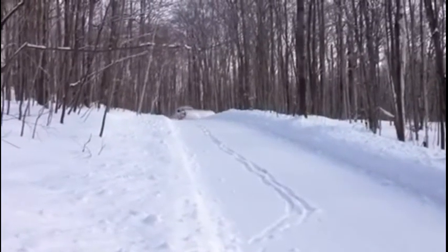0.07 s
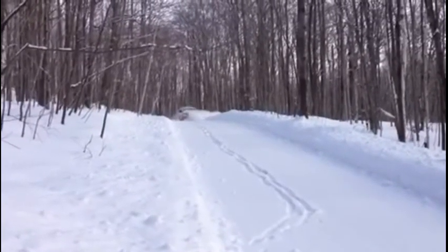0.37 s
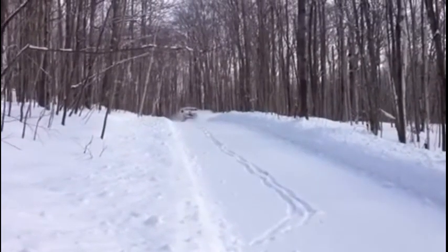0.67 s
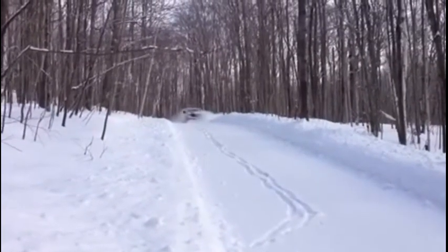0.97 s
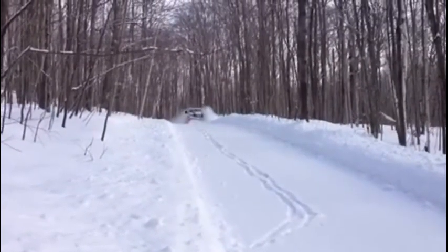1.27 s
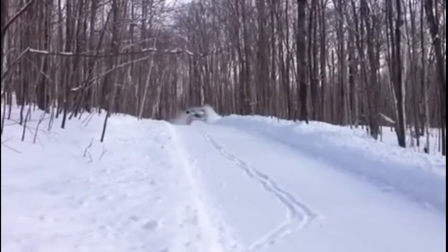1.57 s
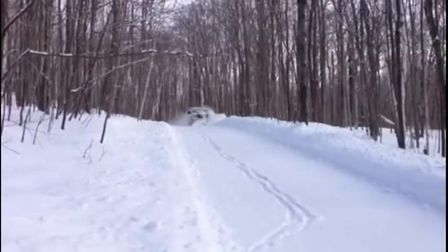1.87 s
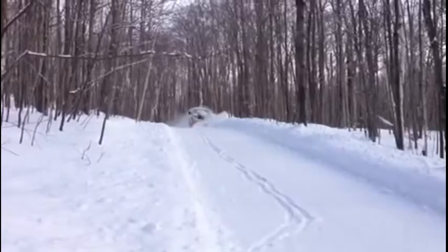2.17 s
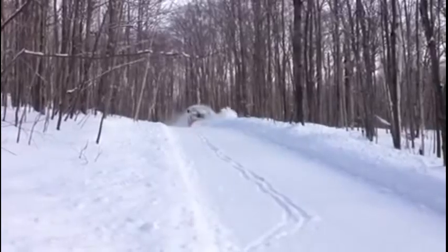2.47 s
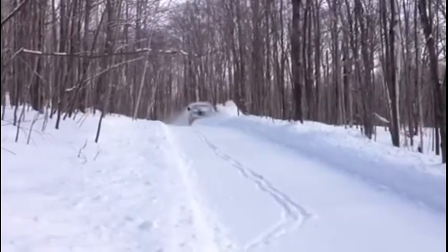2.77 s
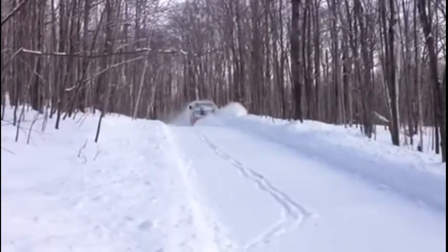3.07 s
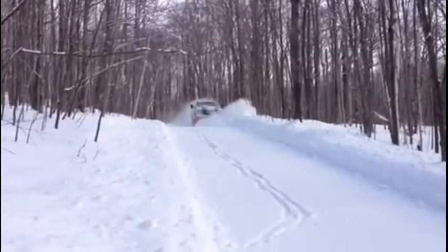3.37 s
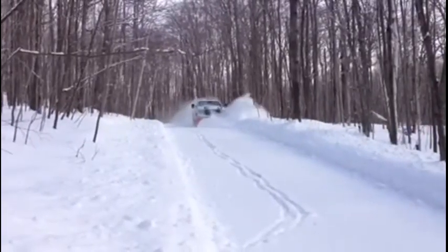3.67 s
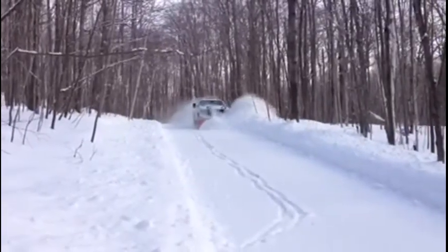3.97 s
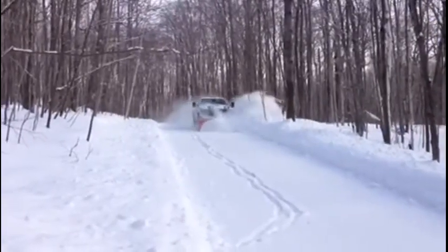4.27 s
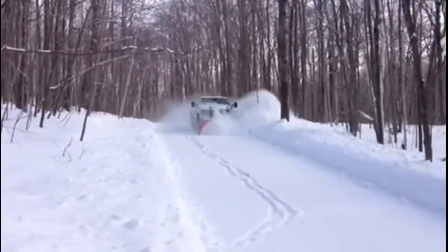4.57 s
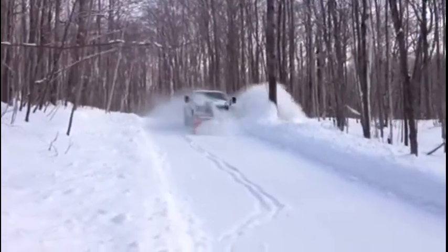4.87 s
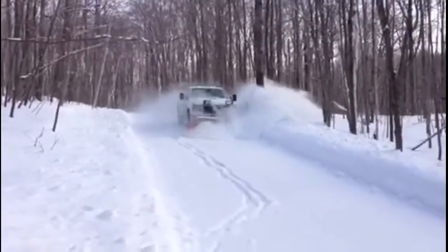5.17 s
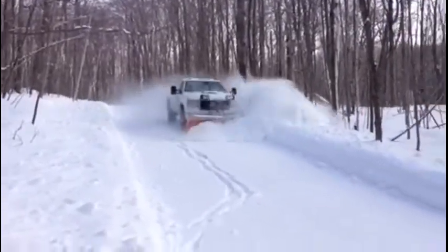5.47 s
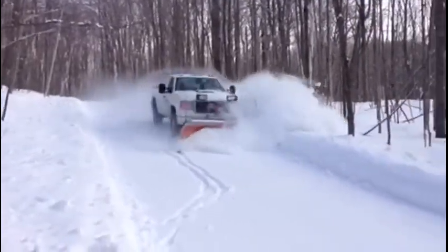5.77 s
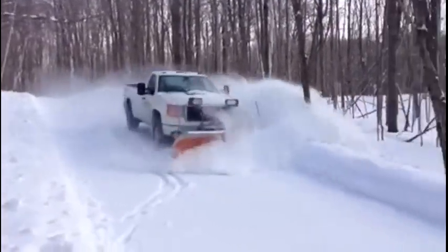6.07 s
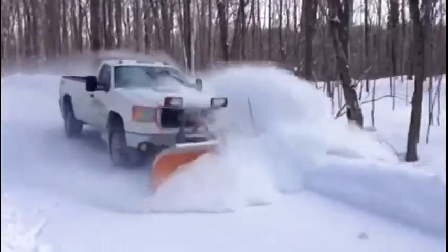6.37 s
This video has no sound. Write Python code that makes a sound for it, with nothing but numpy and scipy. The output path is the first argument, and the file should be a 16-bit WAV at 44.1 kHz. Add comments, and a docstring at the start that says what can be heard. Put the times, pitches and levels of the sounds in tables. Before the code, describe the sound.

A pickup truck pushes a snowplow along a forest road toward a roadside microphone, growing louder throughout. At first it is far off: the steel blade rumbles, scrapes and thumps unevenly over frozen ground, clanking where it catches on crust. The engine is a low hum almost hidden beneath it, and the trees return a thin, dull echo. From just after 2 seconds, crisp, glassy ticks of ice snap close to the microphone, thickest between 4 and 5 seconds. From about 4 seconds the grainy hiss of thrown snow comes up, and from about 4.7 seconds hard lumps of snow knock hollowly on the blade. The bumps and scraping get stronger and drier as the truck nears. From around 6 seconds the hollow of the blade booms, and the plow is loud, close and still approaching when the sound ends at about 6.6 seconds.

```python
"""A pickup truck pushes a snowplow down a forest road, towards one microphone 3 m off its lane.
It starts some 70 m away: the steel blade rumbles, scrapes and thumps over frozen ground, nearly hiding
the engine, and the trees scatter it back. After two seconds crisp ticks begin close to the microphone.
From about four seconds the hiss of thrown snow comes up, then lumps of snow knock on the plate.
By the end the truck is 9 m off, loud and drier, and the hollow of the blade booms."""
import sys
import numpy as np
from scipy import signal
from scipy.fft import rfft, irfft
from scipy.io import wavfile
from scipy.ndimage import uniform_filter1d, minimum_filter1d, map_coordinates

SR = 44100
rng = np.random.default_rng(int(sys.argv[2]) if len(sys.argv) > 2 else 0)


def int16_out(signal):
    """Quantize to a 16-bit WAV file."""
    q = np.round(np.clip(np.atleast_2d(signal).T, -1, 1) * 32767)
    wavfile.write(sys.argv[1], SR, q.astype(np.int16))


N = 292383
TIME = np.arange(N) / SR
SPEED_M_PER_S, PASS_S, LANE_M = 9, 7.6, 3  # the truck would draw level with the microphone at PASS_S
NEAR_M = 10  # the truck's levels hold at this distance

# Broad colours. Each row: frequency in Hz, relative level in dB.
MIC_HISS_COLOUR = [(30, -16), (120, -22), (300, -1), (450, 4), (700, -5.5), (2500, -29), (4200, -9.5),
                   (7000, -12.5), (10000, -12.5), (15000, -20)]  # the background hiss of the microphone
TICK_LOW_COLOUR = [(500, -36), (2000, -22), (3800, -18), (5000, 8), (6500, 11), (8500, 3), (11000, -55),
                   (15000, -31)]  # the snap of ice
TICK_TOP_COLOUR = [(2500, -5), (7000, -5), (10000, -3), (12800, -5.5), (15500, -10)]  # its glassy top
HISS_COLOUR = [(2500, -7), (4000, -5.5), (4800, -3.5), (5700, -0.5), (6400, -1), (7300, -0.5), (8500, -3),
               (10500, -9), (12500, -21)]  # thrown snow
POWDER_COLOUR = [(8000, -31.5), (10800, 2.5), (12500, 1), (15500, -10)]  # its finest dust
ROAR_COLOUR = [(60, -55), (230, -29), (330, -2), (430, -5), (540, 5), (750, 7), (860, -11), (1050, -28),
               (2000, -47)]  # the hollow of the blade
RUMBLE_COLOUR = [(25, -9), (62, -35.5), (85, -30.5), (103, -15.5), (120, -6), (160, 2), (200, 0.5),
                 (280, -9), (350, -10), (450, -21.5), (800, -51)]  # the whole blade shaking
BODY_COLOUR = [(60, -76.5), (230, -30), (330, -2), (430, -6), (540, -1.5), (720, -2.5), (950, -1.5),
               (1250, -3), (1600, -16), (2600, -21.5), (6000, -65.5)]  # its plate
EDGE_COLOUR = [(100, -57), (800, -24), (1350, -1), (1600, 0), (2000, -0.5), (2800, -1.5), (3800, 1),
               (4250, -11.5), (5250, -14), (5750, -6), (6500, -13), (9000, -26), (12000, -38), (16000, -57)]  # its edge scraping
SKIM_COLOUR = [(3500, -28), (5200, -10), (5750, -1.5), (6500, -5), (9000, -20)]  # its edge skimming snow
# Resonances on top of a colour. Each row: centre in Hz, width in Hz, gain in dB.
HISS_PEAK = [(5870, 520, 0.5)]
BLADE_MODES = [(283.3, 31, 10), (495, 22, 3.5), (567, 42, -2.5), (723, 22, -2.5), (756, 16, 5),
               (1168, 6.3, 10.5), (1335, 96, 4), (1900, 214, 7), (1893, 20, -20), (2448, 72, 4.5),
               (2627, 144, 7), (2920, 140, 5.5), (3420, 17, 5), (3210, 17, 0), (3460, 13, -8)]
# Icy ticks by the microphone. Each row: start in seconds, peak of the snap in dB, peak of the top in dB,
# pitch of the top in Hz.
TICKS = [(2.315, -34, -36, 10000), (2.4515, -39, -50, 9000), (2.469, -27.5, -50, 9000),
         (2.704, -39, -25.5, 10300), (3.035, -33, -29, 9500), (3.048, -33, -46, 9000),
         (3.0778, -37, -30, 8500), (3.5097, -36, -40, 10000), (4.1275, -31, -46, 9000),
         (4.182, -14.5, -23, 9800), (4.206, -20, -29, 8500), (4.217, -20, -9, 13900),
         (4.2975, -30, -28, 11000), (4.317, -33, -26, 9500), (4.3343, -40, -27, 12500),
         (4.4397, -27, -25, 12000), (4.4585, -29, -42, 9000), (4.4798, -30, -34, 11000),
         (4.5705, -13, -35, 13500), (4.5772, -23, -44, 9000), (4.5993, -17.5, -42, 9000),
         (4.6495, -23, -30, 13500), (4.6638, -27, -20, 12500), (4.7187, -20, -33, 13500),
         (4.728, -21.5, -22, 13800), (4.8266, -26, -44, 9000), (4.86, -26, -11.5, 12900),
         (5.01, -22, -42, 9000), (5.0446, -32, -41, 9000), (5.3675, -7.5, -19.5, 12000),
         (5.567, -23, -42, 9000), (6.087, -17, -36, 9000), (6.294, -27, -28, 13000)]
# Swishes of snow. Each row: middle in seconds, hiss in dB, powder in dB, half length in seconds.
SWISHES = [(2.287, -61, -70, 0.033), (3.052, -51.5, -59, 0.03), (4.226, -38.5, -72, 0.016),
           (4.375, -52.5, -58, 0.37), (4.658, -48.5, -60, 0.16), (4.94, -47.5, -62, 0.12)]
# Engine speed. Each row: time in seconds, crankshaft rate in Hz.
CRANK_SPEED = [(0, 38), (2, 39), (3.5, 39.5), (5, 38.5), (6.63, 45)]
# Engine tones. Each row: multiple of the crankshaft rate, relative level in dB.
ENGINE_ORDERS = [(3.5, -8.5), (4, -0.5), (5, 1.5), (6, 1), (8, -32)]
# How hard the blade bites into the snow. Each row: time in seconds, gain in dB.
BLADE_LOAD = [(0, -10.5), (.12, -12), (.35, -11), (.56, -4.5), (1.19, -6), (1.54, -4), (1.91, -5.5),
              (2.1, -2.5), (3.3, 0.5), (4.1, 1.5), (4.52, 2), (4.72, 2.5), (5.45, 2), (6.07, 0.5),
              (6.43, 0.5), (6.6, 2.5)]
# How uneven the road is under the blade. Each row: time in seconds, gain of the rumble in dB.
ROAD_ROUGHNESS = [(.1, -13), (.68, -5.5), (1.19, -10), (1.52, -2.5), (1.9, -5), (2.1, -1.5), (2.86, -3),
                  (3.45, -2), (3.9, -5), (4.14, -6), (4.53, -5), (4.72, 0), (5.4, -0.5), (6.43, 2),
                  (6.6, 4)]
# How much treble carries to the microphone. Each row: time in seconds, upper corner in Hz.
TREBLE_REACH = [(0, 3680), (2.5, 3580), (4.2, 2740), (5.5, 2900), (6.1, 3600)]
# Pitches that clanks favour along the road. Each row: time in seconds, edge in Hz, body in Hz.
CLANK_PITCHES = [(2.3, 2440, 776), (3.4, 2500, 644), (4.2, 1780, 564), (4.9, 1800, 825), (5.5, 1750, 770),
                 (6.2, 2330, 720)]
# Lumps of snow on the plate. Each row: start in seconds, level in dB, pitch in Hz.
KNOCKS = [(4.734, -15.5, 756), (4.841, -10.5, 757), (4.897, -13, 960), (4.968, -12, 786),
          (5.268, -11.5, 690), (5.451, -12, 770), (5.533, -11, 774), (5.605, -13, 793), (5.701, -18, 820),
          (5.807, -14, 723), (6.204, -9, 688), (6.353, -9.5, 778), (6.401, -13, 766), (6.493, -17.5, 583),
          (6.531, -10, 740), (6.56, -13.5, 680), (6.576, -11.5, 568), (6.621, -14, 730)]
# The edge catches on crust. Each row: start in seconds, edge in dB, body in dB, length in seconds.
SNAGS = [(0.369, -32.5, -35, 0.025), (0.942, -28.5, -35, 0.021), (1.381, -33, -45, 0.032),
         (1.517, -27, -41, 0.016), (1.676, -27, -37, 0.019), (1.981, -22, -44, 0.0086),
         (2.027, -23.5, -35, 0.011), (2.05, -24.5, -39, 0.012), (2.282, -18, -42, 0.011),
         (2.656, -20.5, -28, 0.0097), (2.773, -27.5, -22, 0.04), (2.986, -26, -20, 0.014),
         (3.203, -21, -28, 0.012), (3.41, -30, -25, 0.012), (3.692, -19, -19.5, 0.01),
         (3.722, -24, -35, 0.016), (3.82, -19.5, -43, 0.008), (3.931, -38, -26, .016),
         (3.955, -22, -46, 0.014), (4.011, -24.5, -44, 0.019), (4.205, -22, -32, 0.011),
         (4.249, -21, -18, 0.0088), (4.614, -19, -20.5, 0.012), (4.843, -18.5, -18, 0.0097),
         (4.9, -21, -25, 0.0068), (4.952, -14, -14, 0.016), (5.227, -13, -12, 0.019),
         (5.803, -24, -24, 0.019), (6.1982, -11, -14.5, 0.011), (6.231, -30, -20.5, 0.016),
         (6.349, -7.5, -10.5, 0.012), (6.485, -23.5, -48, 0.063), (6.562, -26, -22, 0.024)]
# The blade drops on a bump. Each row: start in seconds, swing in dB, edge in dB, body in dB,
# pitch of the swing in Hz.
BUMPS = [(.29, -24, -55, -46, 161), (0.383, -19.5, -39, -46, 188), (0.527, -10.5, -31, -28.5, 171),
         (1.235, -19.5, -50, -41, 270), (1.309, -17, -34, -33, 171), (1.355, -17, -34, -39, 170),
         (1.39, -18, -40, -38, 210), (1.514, -19, -42, -43, 280), (1.68, -17.5, -39, -34, 276),
         (1.768, -14, -31, -35, 174), (1.885, -23, -40, -43, 190), (2.171, -13, -26.5, -26, 166),
         (2.285, -19, -48, -44, 243), (2.4, -13.5, -19.5, -20, 180), (2.476, -14, -18.5, -24.5, 216),
         (2.504, -14, -47, -44, 183), (2.631, -15.5, -41, -37, 270), (2.803, -8, -24, -17, 231),
         (2.877, -11, -40, -28, 195), (3.186, -6.5, -24, -18.5, 285), (3.358, -6, -17, -17, 270),
         (3.477, -11, -25, -24.5, 271), (3.667, -8.5, -17, -15, 208), (3.908, -10, -28, -19.5, 241),
         (4.047, -11.5, -27, -26, 228), (4.063, -8, -21.5, -19, 283), (4.121, -15, -44, -36, 289),
         (4.228, -4, -24, -13, 282), (4.309, -10.5, -36, -25, 266), (4.625, -15, -39, -32, 220),
         (4.693, -12.5, -37, -23, 253), (4.943, -0.5, -19, -19, 253.4), (5.004, -8, -27, -21.5, 182),
         (5.112, -15.5, -42, -40, 190), (5.245, -11, -14, -16.5, 217), (5.566, -11.5, -24, -19, 171),
         (5.677, -10, -28, -22.5, 177), (5.775, -9.5, -22.5, -19, 239), (5.964, -9, -36, -25, 175),
         (6.085, -10.5, -13.5, -16, 286), (6.122, -17, -29, -22.5, 224), (6.209, -6, -25, -15, 285),
         (6.319, -15, -40, -33, 160), (6.359, -4.5, -21, -12.5, 255), (6.4, -14.5, -32, -24, 344),
         (6.5, -17.5, -32, -35, 288), (6.565, -14.5, -28, -26, 352), (6.607, -9, -35, -26, 265)]


def amp(db):
    """Decibels as an amplitude."""
    return 10 ** (np.asarray(db) / 20)


def unit(x):
    """The signal at rms 1."""
    return x / np.sqrt(np.mean(x ** 2) + 1e-20)


def add(mix, s, sound):
    """Mix a sound in at s seconds."""
    part = mix[max(round(s * SR), 0):][:len(sound)]
    part += sound[:len(part)]


def curve(table, s=TIME):
    """A table of times and values, read at s seconds."""
    return np.interp(s, *np.transpose(table))


def wander(hz):
    """Random drift of rms 1, rolling off above hz."""
    f = np.fft.rfftfreq(N, 1 / SR)
    return unit(irfft(rfft(rng.standard_normal(N)) / (1 + (f / hz) ** 4), N))


def response(points, modes=(), size=4096):
    """Causal impulse response of a broad colour with resonances on top."""
    f = np.abs(np.fft.fftfreq(size, 1 / SR))
    hz, level = np.transpose(points)
    db = np.interp(np.log(f + 1), np.log(hz), level)
    for centre, width, height in modes:
        db = db + height / (1 + (2 * (f - centre) / width) ** 2)
    minimum_phase = np.exp(np.conj(signal.hilbert(np.log(amp(db)))))
    return np.fft.ifft(minimum_phase).real[:size // 2]


def colour(x, points, modes=()):
    """The signal through a colour and its resonances, at rms 1."""
    return unit(signal.oaconvolve(x, response(points, modes))[:N])


def grains(per_s, spread_db):
    """Sparse clicks of uneven size."""
    size = amp(spread_db * np.minimum(rng.exponential(1, N), 4)) * rng.choice([-1, 1], N)
    return unit(size * (rng.random(N) < per_s / SR))


def distance(s):
    """Metres from the truck to the microphone."""
    return np.hypot(SPEED_M_PER_S * (PASS_S - s), LANE_M)


def spread_db(s):
    """Sound thins out on its way to the microphone."""
    return -20 * np.log10(distance(s) / NEAR_M)


def roadside_db(table):
    """A level curve of the truck, as heard from the roadside."""
    return curve(table) + spread_db(TIME)


def mic_hiss(db=-58):
    """Faint, steady background hiss of the microphone."""
    return amp(db) * colour(rng.standard_normal(N), MIC_HISS_COLOUR)


def forest(x, t60=0.16, dull_hz=3000, echoes_per_s=1200, first_s=0.018):
    """Trunks along the road scatter a thin, dull echo."""
    t = np.arange(SR) / SR
    taps = rng.standard_normal(SR) * (rng.random(SR) < echoes_per_s / SR)
    taps *= (t > first_s) * amp(-60 * t / t60)
    taps = signal.sosfilt(signal.butter(1, dull_hz, fs=SR, output="sos"), taps / np.linalg.norm(taps))
    return signal.fftconvolve(x, taps)[:N]


def over_snow(x, loss_db):
    """Soft snow and air take the treble above a corner that shifts along the road."""
    hz, s, spectra = signal.stft(x, SR, nperseg=256, noverlap=192)
    lost = 1 - 1 / (1 + (hz[:, None] / curve(TREBLE_REACH, s)) ** 14)
    return signal.istft(spectra * amp(-loss_db * lost), SR, nperseg=256, noverlap=192)[1][:N]


def ticks(splinter_s=0.00086, crumble=0.13, crumble_s=0.017):
    """Ice snaps by the microphone: one sharp, glassy break, a few splinters and a crumbling tail."""
    out, t = np.zeros(N), np.arange(SR // 16) / SR
    decay = np.exp(-t / splinter_s) + crumble * np.exp(-t / crumble_s)
    low = response(TICK_LOW_COLOUR)
    for s, low_db, top_db, top_hz in TICKS:
        top = response(TICK_TOP_COLOUR, [(top_hz, 1800, 10)])
        for ring, db in ((low, low_db), (top, top_db)):
            splinters = rng.choice([-1, 1], len(t)) * decay
            splinters[0] = 4.5  # the break itself
            snap = signal.fftconvolve(splinters, ring)
            add(out, s, amp(db) * snap / abs(snap).max())
    return out


def spray(hiss_db=-38.5, loss_db_per_m=0.53, powder_db=-45, skim_db=-48):
    """Snow leaves the blade as a hiss of tiny grains, rising as it nears; crunchy swishes ride on it."""
    hiss_gain = amp(hiss_db - loss_db_per_m * (distance(TIME) - NEAR_M))
    powder_gain = amp(powder_db + 1.48 * spread_db(TIME))  # fades faster than by distance alone
    swish, dust = np.zeros((2, N))
    for s, swish_db, dust_db, half_s in SWISHES:
        swell = np.exp(-((TIME - s) / half_s) ** 2)
        swish += amp(swish_db) * swell
        dust += amp(dust_db) * swell
    snow = rng.standard_normal(N) + 0.55 * grains(per_s=700, spread_db=4.5)
    snow *= amp(1.4 * wander(hz=30))
    crunch = colour(grains(per_s=65, spread_db=2.5), TICK_LOW_COLOUR) * swish * amp(-4.5)
    ice_specks = colour(grains(per_s=25, spread_db=2.5), TICK_TOP_COLOUR) * dust * amp(-6)
    skim = colour(rng.standard_normal(N), SKIM_COLOUR) * amp(skim_db + roadside_db(BLADE_LOAD))
    hiss = colour(snow, HISS_COLOUR, HISS_PEAK) * (hiss_gain + swish)
    powder = colour(snow, POWDER_COLOUR) * (powder_gain + dust)
    return skim + hiss + powder + crunch + ice_specks


def engine(level_db=-34):
    """Eight cylinders fire four times a turn; uneven firing fills in the neighbouring orders."""
    crank_hz = curve(CRANK_SPEED) * (1 + 0.0084 * wander(hz=4.05))
    turns = np.cumsum(crank_hz) / SR
    tone = sum(amp(db + 1.1 * wander(hz=3.1)) * np.sin(2 * np.pi * (order * turns + rng.random()))
               for order, db in ENGINE_ORDERS)
    trend_db = uniform_filter1d(roadside_db(ROAD_ROUGHNESS), size=SR // 2)  # follows the blade's rumble
    return unit(tone) * amp(level_db + trend_db)


def roar(near_db=-25.5, loss_db_per_m=1.5):
    """The hollow of the blade booms under the rolling snow, heard only over the last few metres."""
    level_db = near_db - loss_db_per_m * (distance(TIME) - NEAR_M)
    rolling_snow = rng.standard_normal(N) * amp(2.8 * wander(hz=30))
    return colour(rolling_snow, ROAR_COLOUR, BLADE_MODES) * amp(level_db)


def flex(x, lag_s=0.000495):
    """The blade flexes: a slowly wandering lag bends every resonance a little up and down."""
    return map_coordinates(x, [(TIME + lag_s * wander(hz=2.87)) * SR], order=3, mode="mirror")


def scraping(rumble_db=-24, body_db=-30, edge_db=-31):
    """The blade grinds along the road; one judder shakes its rumble, its body and its edge."""
    depth = 1.17 + TIME / TIME[-1]  # from afar, scattering by the trees evens the judder out
    judder = depth * np.tanh(wander(hz=15.3))
    shaking = rng.standard_normal(N) * amp(3.2 * judder)
    rumble = colour(shaking, RUMBLE_COLOUR, BLADE_MODES) * amp(rumble_db + roadside_db(ROAD_ROUGHNESS))
    body_grit = rng.standard_normal(N) + 0.4 * grains(per_s=500, spread_db=2.5)
    body = colour(body_grit * amp(2 * judder), BODY_COLOUR, BLADE_MODES)
    edge_grit = rng.standard_normal(N) + 0.55 * grains(per_s=900, spread_db=3)
    edge = colour(edge_grit * amp(1.8 * judder + wander(hz=45)), EDGE_COLOUR, BLADE_MODES)
    return rumble + (body * amp(body_db) + edge * amp(edge_db)) * amp(roadside_db(BLADE_LOAD))


def thump(db, hz, swell_s):
    """A blow swings the heavy blade for a few cycles; little deep bass comes with it."""
    t = np.arange(SR // 8) / SR
    swell = (t / swell_s * np.exp(1 - t / swell_s)) ** 2
    swing = amp(db) * swell * np.sin(2 * np.pi * (hz * t + rng.random()))
    return signal.sosfilt(signal.butter(4, 110, "highpass", fs=SR, output="sos"), swing)


def clank(s, edge_db, body_db, length_s, pitch_scatter=0.14, mode_scatter=0.0226, contacts_per_s=4000):
    """One hard contact and a tight rattle; where it lands favours one pitch each of edge and body."""
    t = np.arange(SR // 6) / SR
    rattle = np.exp(-(t / length_s) ** 2) + 0.3 * np.exp(-t / length_s)
    when, *pitches = np.transpose(CLANK_PITCHES)
    edge_hz, body_hz = [np.interp(s, when, hz) * np.exp(pitch_scatter * rng.standard_normal())
                        for hz in pitches]
    flexed_modes = [(hz * np.exp(mode_scatter * rng.standard_normal()), width, db)
                    for hz, width, db in BLADE_MODES]
    edge = response(EDGE_COLOUR, flexed_modes + [(edge_hz, 330, 7)])
    body = response(BODY_COLOUR, flexed_modes + [(body_hz, 170, 9)])
    out = 0
    for ring, db, rise_s in ((edge, edge_db, 0.0004), (body, body_db, 0.003)):
        shape = rattle * (1 - np.exp(-t / rise_s))
        contacts = shape * rng.choice([-1, 1], len(t)) * (rng.random(len(t)) < contacts_per_s / SR)
        contacts[0] = 1.2  # the first hard contact
        burst = signal.fftconvolve(contacts, ring)
        out = out + amp(db) * burst * np.linalg.norm(shape / shape.max()) / np.linalg.norm(burst)
    return out


def knocks(swell_s=0.0041, mode_split=0.231):
    """Hard lumps of snow hit the plate, which rings hollow in three close modes and rattles a little."""
    out = np.zeros(N)
    for s, db, hz in KNOCKS:
        add(out, s, thump(db, hz, swell_s))
        for side in (-1, 1):
            neighbour_hz = hz * np.exp(side * mode_split * (0.5 + rng.random()))
            add(out, s, thump(db - 7.5, neighbour_hz, swell_s))
        add(out, s, clank(s, edge_db=db - 21.5, body_db=db - 11, length_s=0.019))
    return out * amp(spread_db(TIME))


def snags(light_from_s=1.1, light_per_s=11, scatter_db=2.5):
    """The edge catches hard on frozen crust now and then; light catches between grow louder with load."""
    hard, light = np.zeros((2, N))
    for s, edge_db, body_db, length_s in SNAGS:
        add(hard, s, clank(s, edge_db, body_db, length_s))
    for slot in np.arange(light_from_s, N / SR, 1 / light_per_s):
        db = scatter_db * rng.standard_normal()
        start = slot + rng.random() / light_per_s
        add(light, start, clank(slot, edge_db=db - 33.5, body_db=db - 37, length_s=0.0084))
    return hard * amp(spread_db(TIME)) + light * amp(roadside_db(BLADE_LOAD))


def bumps(usual_swing_db=-13.5, heave_hz=143, heave_db=-4.5):
    """Each bump swings the blade and rattles it; close by, the slower heave of its mount comes through."""
    out = np.zeros(N)
    for s, swing_db, edge_db, body_db, hz in BUMPS:
        rattle_s = 0.025 * np.exp(-0.0775 * (swing_db - usual_swing_db))  # harder swings rattle shorter
        swell_s = 0.0071 * (hz / 243) ** 0.43  # higher swings last longer
        add(out, s, thump(swing_db, hz, swell_s))
        add(out, s, thump(swing_db + heave_db + spread_db(s), heave_hz, swell_s))
        add(out, s, clank(s, edge_db, body_db, rattle_s))
    return out * amp(spread_db(TIME))


def scene():
    """From the roadside: microphone hiss, close ticks, flying snow, the truck and its echo in the trees."""
    snow_and_hiss = spray() + ticks() + mic_hiss()
    # the mount rides higher than the edge, so the snow dulls the blows less
    blows = over_snow(bumps() + snags() + knocks(), loss_db=5)
    truck = over_snow(flex(scraping() + roar()) + engine(), loss_db=9.5) + blows
    echo_db = np.interp(TIME, [0, N / SR], [-11, -18])  # the nearer the truck, the drier
    return (truck + amp(echo_db) * forest(truck) + snow_and_hiss)[None]


def record(dry, low_cut_hz=62, high_cut_hz=15450, ceiling=0.92, limiter_samples=131):
    """The microphone sheds the deep bass, a quick limiter holds the peaks, and the very top is cut."""
    thin = signal.sosfilt(signal.butter(3, low_cut_hz, "highpass", fs=SR, output="sos"), dry)
    allowed_gain = minimum_filter1d(ceiling / np.maximum(abs(thin), ceiling), size=limiter_samples)
    limited = thin * uniform_filter1d(allowed_gain, size=limiter_samples)
    high_cut = signal.firwin(511, high_cut_hz, window=("kaiser", 9), fs=SR)
    return signal.oaconvolve(limited, high_cut[None], "same")


dry = scene()
out = record(dry)
int16_out(out)
```